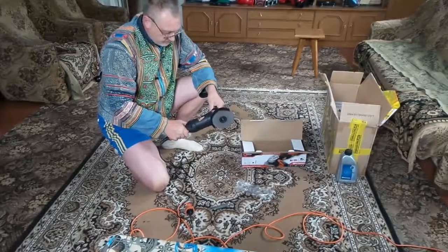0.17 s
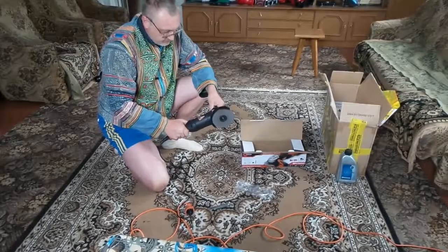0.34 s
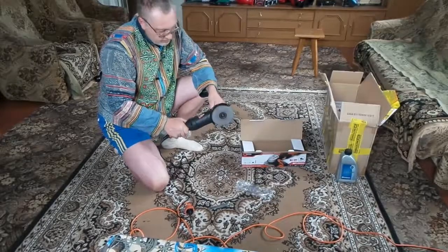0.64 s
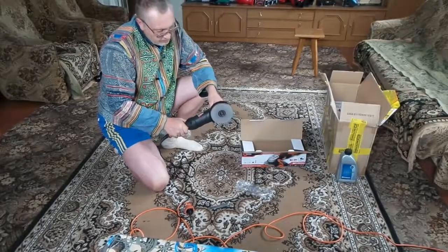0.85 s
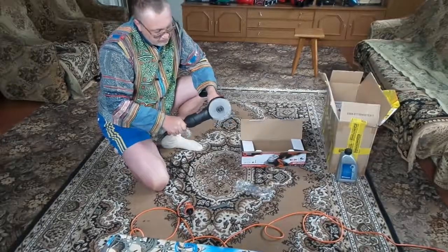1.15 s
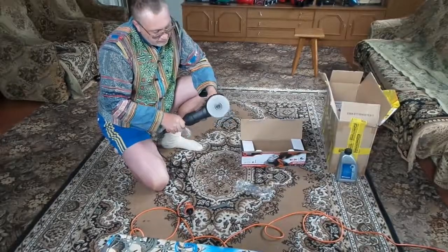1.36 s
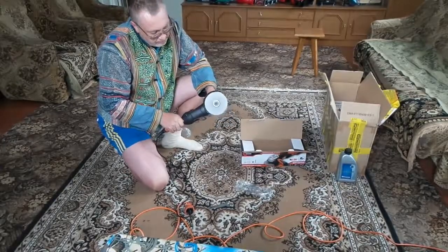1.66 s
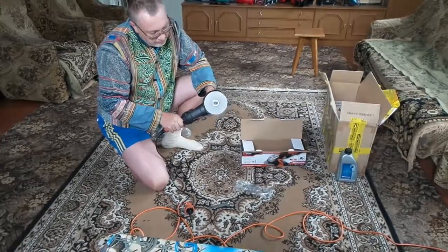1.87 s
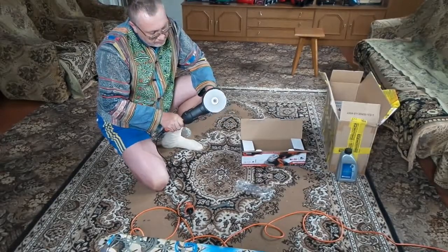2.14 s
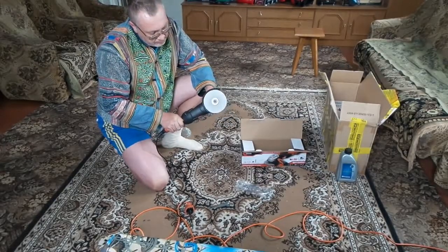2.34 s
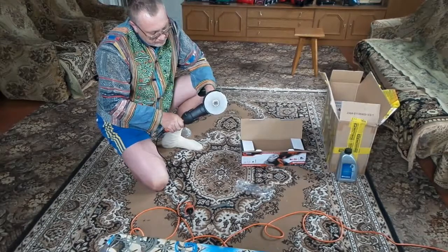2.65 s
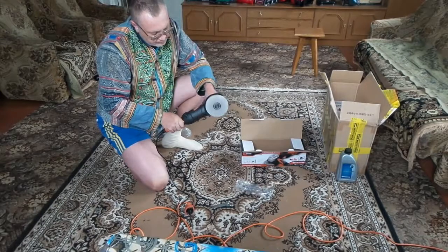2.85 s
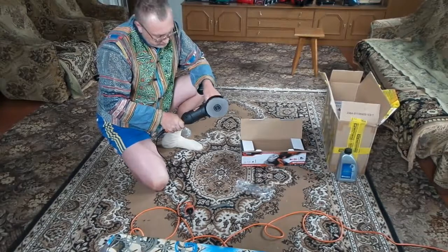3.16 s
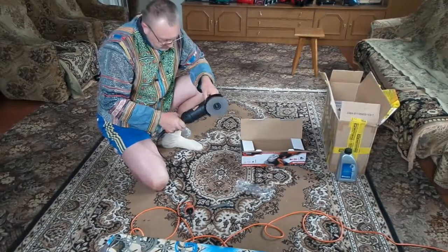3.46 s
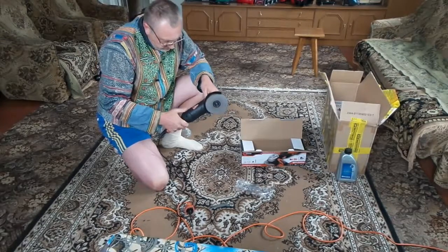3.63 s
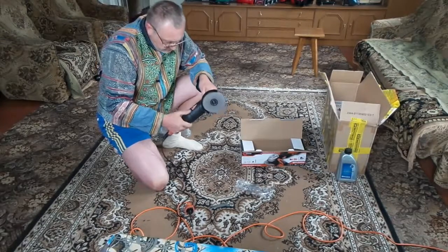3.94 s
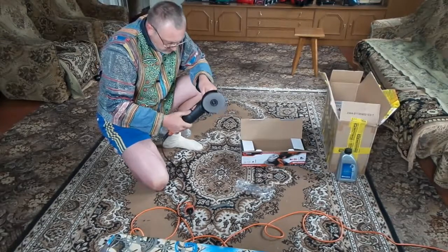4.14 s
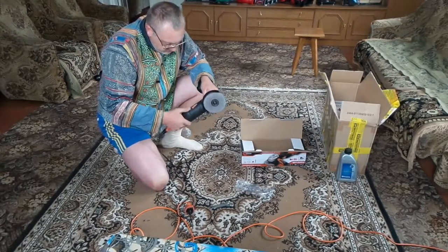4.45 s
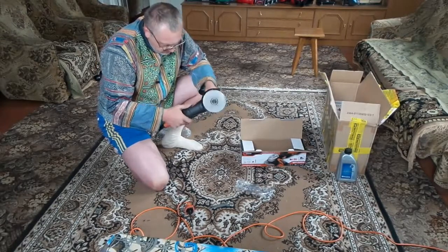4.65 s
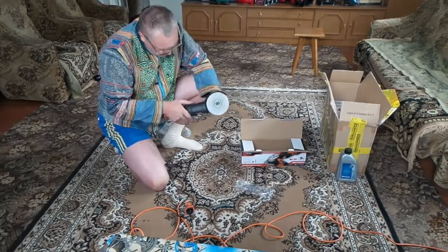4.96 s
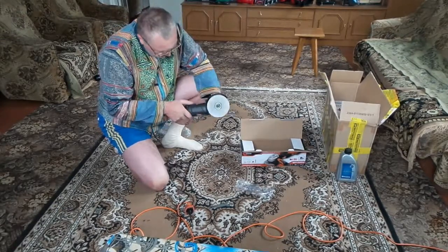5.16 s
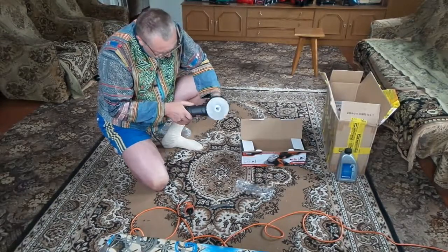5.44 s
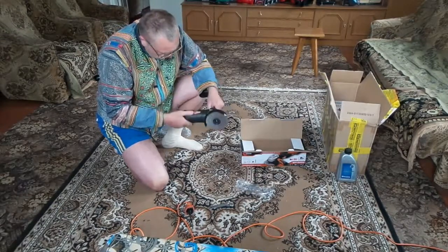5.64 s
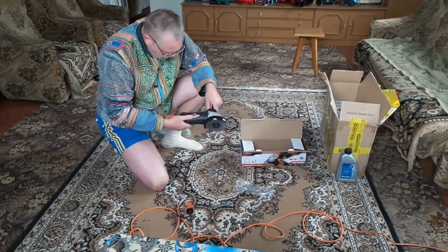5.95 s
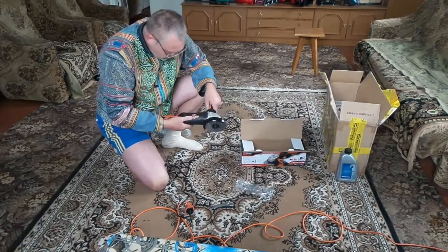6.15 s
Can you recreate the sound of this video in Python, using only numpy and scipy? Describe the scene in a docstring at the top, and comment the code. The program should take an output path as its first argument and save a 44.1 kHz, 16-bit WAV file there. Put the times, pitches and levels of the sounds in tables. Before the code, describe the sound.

Running free indoors, an angle grinder slows its high whine and winds down, its gears rattling and ticking until it stops.

```python
"""A carpeted living room: an angle grinder runs free, is dialled down, switched off and coasts to rest.
Its bevel gears chatter, then knock one by one in their backlash, ringing the gear case and the disc.
The cooling fan rushes, the bearings murmur, the rotor hums and the commutator whines, all falling
with the speed. Quiet room air and a few soft low bumps lie underneath."""
import sys
import numpy as np
from scipy import signal
from scipy.fft import rfft, irfft, next_fast_len
from scipy.io import wavfile
from scipy.ndimage import uniform_filter1d

SR = 44100
rng = np.random.default_rng(int(sys.argv[2]) if len(sys.argv) > 2 else 0)


def put_to_file(sound):
    """Save the sound as 16-bit audio at rate SR, in the file named by the first command-line argument."""
    columns = np.atleast_2d(sound).T  # one column per channel
    safe = np.clip(columns, -1, 1)
    whole_steps = np.round(safe * 32767)
    wavfile.write(sys.argv[1], SR, whole_steps.astype(np.int16))


N = 277830
TIME_S = np.arange(N) / SR
TAPS = 16384  # impulse response length
GRID_HZ = np.fft.rfftfreq(TAPS, 1 / SR)
WIDE_FFT = next_fast_len(N + TAPS)
WIDE_GRID_HZ = np.fft.rfftfreq(WIDE_FFT, 1 / SR)
FULL_RPS = 408  # top rotor speed; rps = turns per second

# Single backlash knocks: start_s, level_db, disc_offset_db
KNOCKS = [(0.0243, -6, -23), (0.0887, -7, -29), (0.1026, -5, -25), (1.7315, -12, -10), (2.7993, -13.5, 5),
          (3.7067, -10, -23), (3.7466, -18, -9), (3.801, -6, -21), (3.8219, -7.5, -25), (3.848, -10, -22),
          (3.9407, -13, -23), (3.983, -7, -28), (4.0673, -12.5, 3), (4.121, -15, 1.5), (4.19, -18, -18),
          (4.213, -15, -12), (4.266, -15, -7), (4.3015, -11, -11), (4.3352, -8.5, -19), (4.362, -13, -15),
          (4.3964, -9, -20), (4.4194, -10.5, -5), (4.4498, -9, -1), (4.472, -8.5, -9), (4.507, -11.5, 5),
          (4.5316, -12.5, -6), (4.558, -8.5, -7), (4.5953, -7, -4), (4.6174, -10, 2), (4.6414, -9, -23),
          (4.6732, -10, 2), (4.708, -12, -9), (4.741, -17, -4), (4.775, -9.5, -1), (4.809, -12, -18),
          (4.8277, -10.5, -6), (4.8694, -15, 2), (4.8811, -10, -21), (4.896, -13, -14), (4.924, -14, -16),
          (4.9507, -15, -17), (4.976, -17, -12), (5.0156, -12.5, -6), (5.0457, -14.5, -4),
          (5.062, -11, -14), (5.0792, -11.5, -8), (5.0986, -13, -8), (5.109, -21, -18), (5.1647, -12, -26),
          (5.1807, -13, -21), (5.229, -17, -10), (5.2702, -16, -8), (5.2917, -15, -6), (5.314, -15, -18),
          (5.3268, -16, -22), (5.3724, -19, 0), (5.4123, -21, 3), (5.433, -21, -13), (5.444, -20, -16),
          (5.4619, -19, 2), (5.482, -20, 1), (5.538, -24, -17), (5.616, -24, 3), (5.6453, -24, -3),
          (5.6623, -27, -7), (5.6785, -22.5, 0.5), (5.69, -28, -1), (5.7074, -29, -14),
          (5.7364, -23.5, -19), (5.7486, -25, -11), (5.769, -32, -16), (5.8182, -31.5, 4),
          (5.8598, -30, -20), (5.911, -35, -2), (5.917, -33, -4), (5.928, -39, -10), (5.9722, -25.5, -21),
          (5.987, -32, -16), (6.0292, -32, -15), (6.0484, -35, -3), (6.054, -40, -12), (6.077, -48, -14),
          (6.143, -44, -17), (6.1593, -38, -2.5)]
# Gear case spectrum under slow tooth blows: freq_hz, level_db
CASE_SLOW = [(200, -58), (700, -39), (1300, -14), (2200, -8), (2800, -5.5), (3600, -3), (4200, -0.5),
             (4900, 1), (5500, -7), (6000, -11.5), (7300, -11.5), (8500, -20), (11000, -24), (15000, -27.5)]
# Modes of gears and case: freq_hz, width_hz, level_db (relative to the case spectrum)
CASE_MODES = [(2400, 60, -1), (3095, 45, 7), (3175, 60, 1), (3370, 55, 3), (3447, 30, 1), (4226, 45, -2),
              (4684, 40, -1), (4890, 120, -1), (5374, 24, 9), (5673, 30, 1), (6778, 45, 2), (7035, 80, 2),
              (8375, 70, 1), (12000, 500, 0)]


def gain_of(db):
    """Decibels to amplitude."""
    return 10 ** (np.asarray(db) / 20)


def curve_at(points, hz):
    """Interpolates (freq_hz, value) points on a log-frequency axis."""
    freq_hz, value = np.transpose(points)
    return np.interp(np.log(hz + 1), np.log(freq_hz + 1), value)


def mode_power(modes):
    """Power response of a set of resonances."""
    return sum(gain_of(db) ** 2 / (1 + (2 * (GRID_HZ - hz) / width_hz) ** 2)
               for hz, width_hz, db in modes)


def impulse_response(gain):
    """Minimum-phase response of unit energy with the given spectral shape."""
    log_gain = np.log(np.maximum(gain / gain.max(), 1e-5))
    mirrored = np.r_[log_gain, log_gain[-2:0:-1]]
    response = np.fft.ifft(np.exp(np.conj(signal.hilbert(mirrored)))).real
    return response / np.linalg.norm(response)


def through(force, response):
    """Plays a force through an impulse response."""
    return signal.oaconvolve(force, response)[:N]


def equalised(x, gain):
    """Applies one gain per frequency of WIDE_GRID_HZ."""
    return irfft(rfft(x, WIDE_FFT) * gain, WIDE_FFT)[..., :N]


def coloured_noise(spectrum):
    """Unit-power noise shaped by (freq_hz, level_db) points."""
    return through(rng.standard_normal(N), impulse_response(gain_of(curve_at(spectrum, GRID_HZ))))


def wander(corner_hz):
    """Slow random drift of unit rms."""
    coarse_s = TIME_S[::100]
    count = len(coarse_s)
    rolloff = 1 + (np.fft.rfftfreq(count, coarse_s[1]) / corner_hz) ** 4
    drift = irfft(rfft(rng.standard_normal(count)) / rolloff, count)
    return np.interp(TIME_S, coarse_s, drift / np.sqrt(np.mean(drift ** 2)))


def steadied(x, samples):
    """Brings the running power to one."""
    power = uniform_filter1d(uniform_filter1d(x ** 2, samples), samples)
    return x / np.sqrt(np.maximum(power, 1e-6))


def add(mix, start_s, sound):
    """Mixes a sound in at start_s."""
    part = mix[max(round(start_s * SR), 0):][:len(sound)]
    part += sound[:len(part)]


def power_law_db(rps, full_db, db_per_decade):
    """Level that follows a power of the speed."""
    return full_db + db_per_decade * np.log10(rps / FULL_RPS)


def plateau_db(rps, top_db, knee_rps, power):
    """Level that grows with speed up to a knee, then holds."""
    return top_db - 10 * np.log10(1 + (knee_rps / rps) ** power)


def humps_db(rps, humps):
    """Level gained or lost around certain speeds."""
    return sum(db * np.exp(-((rps - centre_rps) / width_rps) ** 2) for centre_rps, width_rps, db in humps)


def background(air_db=-62.5, rumble_db=-69, rumble_mid_s=4.78, rumble_half_s=1.05, bump_s=.052):
    """Quiet room air, soft low bumps and a faint rumble that swells and fades."""
    air_spectrum = [(30, -6), (70, -29), (150, -18), (230, -10.5), (380, -13), (700, -14), (1500, -21),
                    (5000, -21), (15000, -20)]  # room air: freq_hz, level_db
    low_spectrum = [(20, -5), (110, -2.5), (170, -1), (400, -31)]  # bumps and rumble: freq_hz, level_db
    bumps = [(0.565, -69), (1.713, -59), (2.242, -63), (2.301, -63), (2.39, -68), (2.609, -64), (2.67, -66),
             (2.803, -64), (2.951, -62), (3.05, -59), (3.259, -63), (3.394, -62), (3.528, -68),
             (3.819, -70), (3.959, -66), (4.04, -64), (4.197, -67), (4.999, -72)]  # low bumps: start_s, level_db
    swell = np.exp(-((TIME_S - rumble_mid_s) / rumble_half_s) ** 4)
    envelope = swell * gain_of(rumble_db + 2 * wander(6.2))
    for start_s, level_db in bumps:
        add(envelope, start_s, gain_of(level_db) * signal.windows.tukey(round(bump_s * SR)))
    rumble = steadied(coloured_noise(low_spectrum), samples=1500) * envelope
    air = np.array([coloured_noise(air_spectrum) for _ in range(2)])
    return gain_of(air_db) * air + rumble


def reflections(early_db=2, early_s=.0077):
    """Sparse stereo room echoes; each band dies at its own rate."""
    decay = [(200, 0.31), (1600, 0.71), (5000, 0.53), (15000, 0.033)]  # reverberation time: freq_hz, t60_s
    t = TIME_S[:TAPS]
    taps = rng.choice([-1., 1.], (2, TAPS)) * (rng.random((2, TAPS)) < .2) * (t > .0005)
    taps *= 1 + gain_of(early_db) * np.exp(-t / early_s)
    band_hz, frame_s, bands = signal.stft(taps, SR, nperseg=256)
    bands *= gain_of(-60 * frame_s / curve_at(decay, band_hz)[:, None])
    bands /= np.linalg.norm(bands, axis=-1, keepdims=True)
    tail = signal.istft(bands, SR, nperseg=256)[1]
    return tail / np.linalg.norm(tail, axis=-1, keepdims=True)


def room(x, block=6144, pose_count=12):
    """Direct sound plus a short tail; the reflections shift as the tool moves in the hands."""
    direct = [(300, .65), (2500, .37)]  # sound straight from the tool: freq_hz, power_share
    poses = [reflections() for _ in range(pose_count)]
    hop = block // 2
    padded = np.pad(x, (hop, block))
    wet = np.zeros((2, N + block))
    for start in range(0, N + hop, hop):
        piece = padded[start:start + block] * signal.windows.cosine(block)
        for side, tail in zip(wet, poses[start // hop % pose_count]):
            add(side, start / SR, signal.fftconvolve(piece, tail))
    share = curve_at(direct, WIDE_GRID_HZ)
    return equalised(x, np.sqrt(share)) + equalised(wet[:, hop:hop + N], np.sqrt(1 - share))


def rotor_rps(start_rps=400, low_rps=250, dial_s=.44, lag_s=.96, off_s=3.46,
              friction_rps_per_s=69, drag_per_s=.22):
    """The rotor tops out, eases to the low setting, then coasts against dry friction and air drag."""
    rising = FULL_RPS - (FULL_RPS - start_rps) * np.maximum(1 - TIME_S / dial_s, 0) ** 2
    dialled_s = np.clip(TIME_S, dial_s, off_s) - dial_s
    driven = low_rps + (rising - low_rps) * np.exp(-dialled_s / lag_s)
    coasted_s = np.maximum(TIME_S - off_s, 0)
    brake_rps = friction_rps_per_s / drag_per_s
    return np.maximum((driven + brake_rps) * np.exp(-drag_per_s * coasted_s) - brake_rps, .1)


def bearing_murmur(rps, fade_rps=2.5):
    """The balls roll softly until the rotor stops."""
    spectrum = [(60, -29.5), (150, -28), (230, 2), (380, -1.5), (700, -4), (1500, -29), (6000, -11),
                (15000, -19)]  # rolling noise: freq_hz, level_db
    level_db = power_law_db(rps, full_db=-57.5, db_per_decade=1)
    return coloured_noise(spectrum) * gain_of(level_db) * np.minimum(rps / fade_rps, 1)


def ball_tone(rps, angle, passes_per_turn=2.57):
    """The tone of the passing bearing balls sounds only as it falls through two resonances."""
    modes = [(505, 14, -50), (446, 14, -49)]  # resonances: freq_hz, width_hz, level_db
    pitch_hz = passes_per_turn * rps
    envelope = sum(gain_of(db) * np.exp(-((pitch_hz - hz) / width_hz) ** 2) for hz, width_hz, db in modes)
    return envelope * np.sin(passes_per_turn * angle)


def disc_wobble(rps, angle, gear_ratio=3):
    """The disc wobbles twice per spindle turn, audible only near full speed."""
    return gain_of(power_law_db(rps, full_db=-56, db_per_decade=204)) * np.sin(2 / gear_ratio * angle)


def rotor_hum(rps, angle):
    """Unbalance hum; standing waves of the room lift and swallow it as it glides."""
    standing_waves = [(420, 14, 7.5), (368, 10, -5.5), (334, 4, -33), (252, 10, -13), (220, 13, 12),
                      (188, 12, -10)]  # room peaks and nulls: freq_hz, width_hz, gain_db
    level_db = power_law_db(rps, full_db=-41, db_per_decade=94) + humps_db(rps, standing_waves)
    return gain_of(level_db) * np.sin(angle)


def whine(rps, angle, fan_db, bars=24, whistle_order=31, silent_rps=175, singing_rps=225):
    """Rotor overtones, the tooth mesh tone, commutator whine and bearing whistle flutter as the tool moves in
    the hands."""
    overtones = [(2, -27.5), (3, -18), (4, -15), (5, -22), (12, -5.5)]  # rotor overtones and, at 12 cycles per turn, the tooth mesh tone: cycles_per_turn, level_db (relative to the fan)
    housing_mode = [(5920, 480, -32)]  # motor housing resonance: freq_hz, width_hz, level_db
    commutator_db = np.interp(bars * rps, GRID_HZ, 10 * np.log10(mode_power(housing_mode)))
    whistle_db = power_law_db(rps, full_db=-45, db_per_decade=42)
    case_lift_db = 10 * np.log10(1 + mode_power(CASE_MODES))  # overtones swell on crossing a case mode
    tones = [(order, fan_db + db + np.interp(order * rps, GRID_HZ, case_lift_db), 4.5)
             for order, db in overtones]
    tones += [(bars, commutator_db, 1.5), (whistle_order, whistle_db, 1.5)]
    stereo = np.zeros((2, N))
    for order, level_db, flutter_db in tones:
        for side in stereo:
            envelope = gain_of(level_db + flutter_db * np.minimum(wander(7), 1))
            side += envelope * np.sin(order * angle + .5 * wander(7.1))
    return stereo * np.clip((rps - silent_rps) / (singing_rps - silent_rps), 0, 1)


def motor(rps, fan_db, waver=.00049):
    """All tones locked to the slightly wavering rotor."""
    angle = 2 * np.pi * np.cumsum(rps * (1 + waver * wander(14))) / SR
    low_tones = rotor_hum(rps, angle) + disc_wobble(rps, angle) + ball_tone(rps, angle)
    return np.sqrt(2) * (low_tones + whine(rps, angle, fan_db))  # levels are rms


def fan(level_db):
    """Turbulent cooling air leaves the vents."""
    spectrum = [(60, -57), (150, -40), (200, -38), (260, -14.5), (350, -11), (480, -5.5), (600, -1.5),
                (690, 6), (800, 2.5), (980, 4.5), (1200, 0.5), (2000, 7.5), (5000, -23), (15000, -57)]  # fan air: freq_hz, level_db
    return coloured_noise(spectrum) * gain_of(level_db)


def case_ring(spectrum):
    """One tooth blow as the gear case radiates it."""
    return impulse_response(gain_of(curve_at(spectrum, GRID_HZ)) * np.sqrt(1 + mode_power(CASE_MODES)))


def disc_ring():
    """One tooth blow as the disc radiates it."""
    spectrum = [(600, -33), (1200, -15), (1500, -2.5), (1800, -3.5), (2200, -5.5), (4000, -50), (5400, -15),
                (7000, -2)]  # disc radiation: freq_hz, level_db
    modes = [(1440, 30, -11), (1615, 30, -1), (1650, 70, -2.5), (1728, 40, -6), (1762, 38, -4),
             (1890, 60, -16), (5374, 26, -4)]  # modes of disc and spindle: freq_hz, width_hz, level_db
    return impulse_response(gain_of(curve_at(spectrum, GRID_HZ)) * np.sqrt(mode_power(modes)))


def tooth_skid(skid_s, corner_hz):
    """A tooth lands and skids briefly; the contact is too soft for the top treble."""
    t = TIME_S[:512]
    force = rng.choice([-1., 1.], len(t)) * np.exp(-t / skid_s)
    force = signal.lfilter(*signal.butter(2, corner_hz, fs=SR), force)
    return force / np.linalg.norm(force)


def steel_on_steel(force, corner_hz=3300):
    """A hard knock feeds mostly the upper modes of the case."""
    return np.sqrt(2) * signal.lfilter(*signal.butter(2, corner_hz, "high", fs=SR), force)


def softened(force, rps, firm_rps=150, corner_hz=6800):
    """Slow teeth meet gently and lose their top treble."""
    firm = np.clip(rps / firm_rps, 0, 1)
    dull = signal.filtfilt(*signal.butter(2, corner_hz, fs=SR), force)
    return firm * force + (1 - firm) * dull


def tooth_contact(flight_s=.012, dip_db=-3.5):
    """Chatter gain: it dips while the teeth cross the gap ahead of a knock."""
    apart = np.zeros(N)
    for start_s, _, _ in KNOCKS:
        add(apart, start_s - flight_s, signal.windows.tukey(round(flight_s * SR), .25))
    return gain_of(dip_db * np.minimum(apart, 1))


def band_swells(x, rps):
    """Bands of the gear chatter swell and dip as the grinder slows."""
    swells = [(5300, 300, 185, 45, 6.5), (5374, 70, 285, 22, -3), (3250, 500, 108, 22, 2.5),
              (3250, 600, 352, 22, -3), (4000, 900, 185, 10, -4), (4200, 1200, 140, 15, -1.5),
              (7000, 2000, 180, 35, -2), (4820, 350, 45, 18, 4), (7200, 1500, 30, 30, -3),
              (4800, 550, 400, 35, 2), (3700, 1100, 400, 40, -1), (3600, 1100, 305, 17, 2.5),
              (6300, 1800, 311, 10, 2), (4850, 600, 150, 38, -3), (4000, 700, 166, 8, 3.5),
              (3200, 600, 38, 8, -3), (3150, 450, 22, 6, 3.5), (3150, 450, 268, 12, 2)]  # band swells and dips: freq_hz, width_hz, centre_rps, width_rps, gain_db
    for freq_hz, width_hz, *hump in swells:
        band = signal.lfilter(*signal.iirpeak(freq_hz, freq_hz / width_hz, fs=SR), x)
        x = x + band * (gain_of(humps_db(rps, [hump])) - 1)
    return x


def rim_pings(pitch_hz=5376, t60_s=.12):
    """Blows on the gear rim ring one high, clean mode."""
    blows = [(4.395, -24), (4.45, -19), (4.557, -20), (4.573, -25), (4.617, -29), (4.707, -25),
             (5.079, -29), (5.098, -28), (5.165, -30), (5.181, -31), (5.313, -31), (5.479, -29),
             (5.506, -30), (5.678, -30), (5.737, -35), (5.848, -48), (6.014, -50), (6.143, -58)]  # rim blows: start_s, level_db
    pings, t = np.zeros(N), TIME_S[:TAPS]
    for start_s, level_db in blows:
        add(pings, start_s, gain_of(level_db - 60 * t / t60_s) * np.sin(2 * np.pi * pitch_hz * t))
    return pings


def knocks(case_db=12, disc_db=16.5):
    """The disc overruns and clacks against the pinion, mostly while coasting."""
    on_case, on_disc = np.zeros((2, N))
    for start_s, level_db, disc_offset_db in KNOCKS:
        add(on_case, start_s, gain_of(level_db + case_db) * tooth_skid(skid_s=.0039, corner_hz=6000))
        add(on_disc, start_s, gain_of([level_db + disc_db + disc_offset_db]))
    return through(steel_on_steel(on_case), case_ring(CASE_SLOW)) + through(on_disc, disc_ring())


def backlash(rps, base_per_s=40, per_turn=.18, uneven_above_rps=200, spread_db=2):
    """The gear bounces between the tooth flanks: unevenly at speed, more evenly as it slows."""
    force, start_s = np.zeros(N), 0
    for gap, size in rng.standard_normal((700, 2)):
        add(force, start_s, gain_of(spread_db * min(size, 1)) * tooth_skid(skid_s=.0028, corner_hz=6500))
        now_rps = rps[min(int(start_s * SR), N - 1)]
        jitter = .36 if now_rps > uneven_above_rps else .2
        start_s += np.exp(jitter * gap) / (base_per_s + per_turn * now_rps)
    return steadied(force, samples=5000)


def gear_chatter(rps, teeth=12, sliding_per_s=1800, slow_rps=235, fast_rps=400):
    """Fine tooth contacts and backlash bounces ring case and disc; faster blows sound harder."""
    case_fast = [(200, -107), (700, -15), (1400, -36), (2200, -16.5), (2900, -7.5), (3600, -6.5),
                 (4300, -3), (4900, -1.5), (5400, -9), (6000, -14.5), (7300, -17), (8500, -19.5),
                 (11000, -24), (15000, -28)]  # gear case spectrum under fast blows: freq_hz, level_db
    shudder = [(139, 17.4, 4.5)]  # disc shudder while coasting: centre_rps, width_rps, gain_db
    shudder_db = humps_db(rps, shudder)
    contact_loss_db = .29 * shudder_db  # the shudder parts the teeth
    tight_db = -10 * (rps / FULL_RPS) ** 3.1  # a tight mesh rings the disc less
    case_db = plateau_db(rps, top_db=-17.5, knee_rps=140, power=3.04) - contact_loss_db
    disc_db = plateau_db(rps, top_db=-29.5, knee_rps=102, power=2.94) + shudder_db + tight_db

    contact = tooth_contact()
    touches = rng.random(N) < (teeth * rps + sliding_per_s) / SR
    mesh = steadied(rng.standard_normal(N) * touches, samples=1000) * contact
    bounce = backlash(rps) * contact
    easing = 1 - .25 * np.clip(1 - rps / slow_rps, 0, 1)  # bouncing gives way to single knocks
    case_share, disc_share = .17 * easing, .71 * easing  # bounce share of the power
    on_case = np.sqrt(1 - case_share) * mesh + np.sqrt(case_share) * steel_on_steel(bounce)
    on_disc = np.sqrt(1 - disc_share) * mesh + np.sqrt(disc_share) * bounce
    on_case = softened(on_case, rps) * gain_of(case_db)

    hardness = np.clip((rps - slow_rps) / (fast_rps - slow_rps), 0, 1)
    hard_ring = through(on_case * hardness, case_ring(case_fast))
    soft_ring = through(on_case * (1 - hardness), case_ring(CASE_SLOW))
    return hard_ring + soft_ring + through(on_disc * gain_of(disc_db), disc_ring())


def scene():
    """The grinder runs down in its room."""
    rps = rotor_rps()
    fan_db = power_law_db(rps, full_db=-28, db_per_decade=18.5)
    gearbox = band_swells(gear_chatter(rps) + knocks(), rps) + rim_pings()
    return room(gearbox + fan(fan_db) + bearing_murmur(rps)) + motor(rps, fan_db) + background()


def record(dry, ceiling=.95, cutoff_hz=15480):
    """Colours left and right differently, rounds off the tallest peaks and limits the band."""
    balance = [(60, -1), (92, 13), (140, -5), (210, 2), (330, -1), (500, -0.5), (770, 0), (1170, 0.5),
               (1790, -2), (2740, 0.5), (4190, -3.5), (6410, -4.5), (9810, 0), (15000, -4)]  # stereo balance: freq_hz, left_minus_right_db
    balance_db = curve_at(balance, WIDE_GRID_HZ)
    coloured = equalised(dry, gain_of(np.array([balance_db, -balance_db]) / 2))
    rounded = coloured / (1 + (abs(coloured) / ceiling) ** 8) ** (1 / 8)
    lowpass = signal.firwin(511, cutoff_hz, window=("kaiser", 9), fs=SR)
    return signal.oaconvolve(rounded, lowpass[None], "same")


dry = scene()
out = record(dry)
put_to_file(out)
```